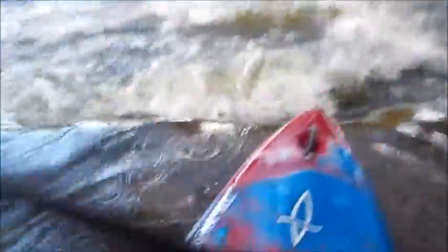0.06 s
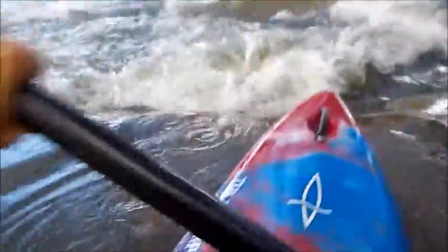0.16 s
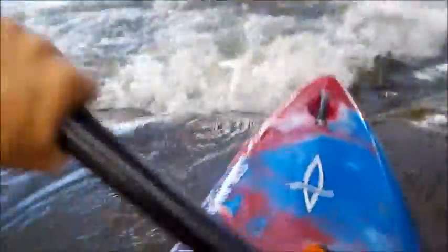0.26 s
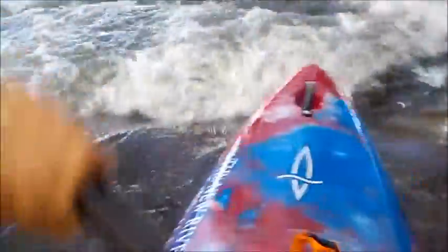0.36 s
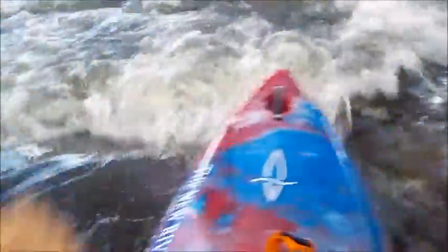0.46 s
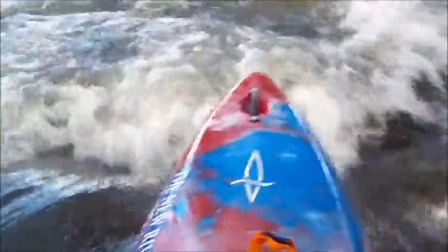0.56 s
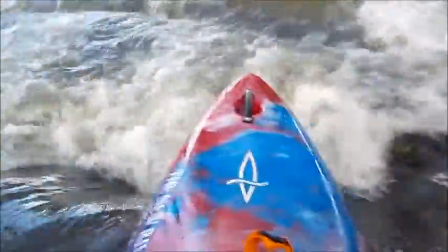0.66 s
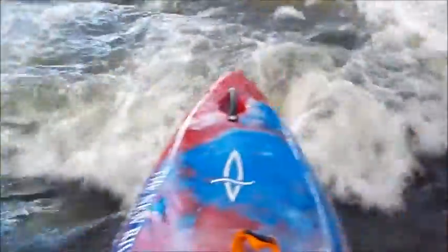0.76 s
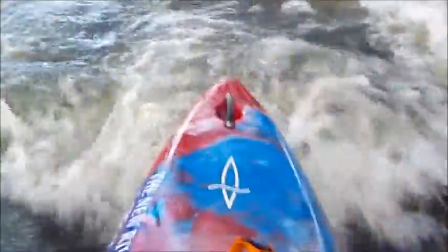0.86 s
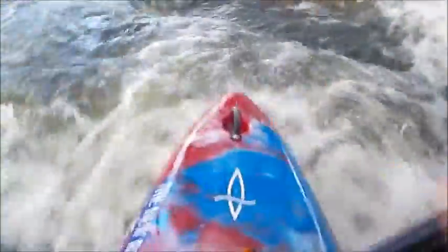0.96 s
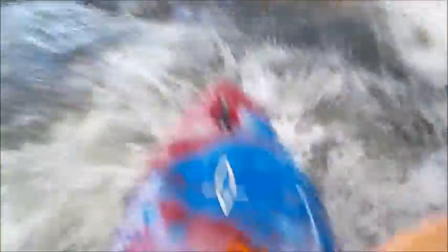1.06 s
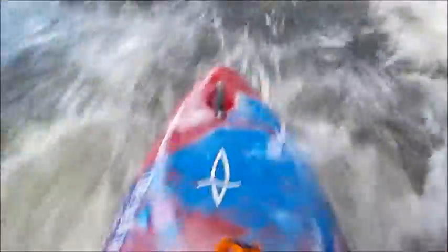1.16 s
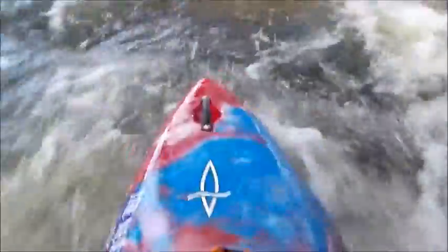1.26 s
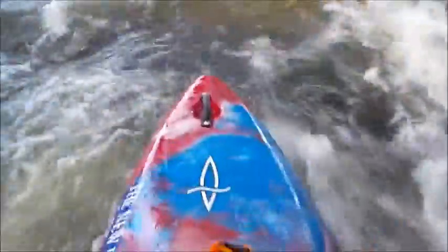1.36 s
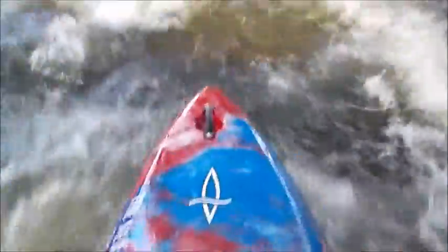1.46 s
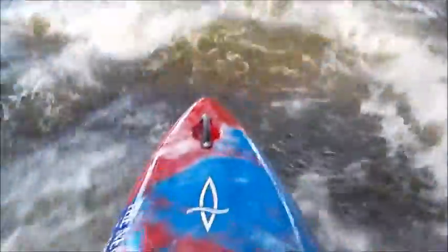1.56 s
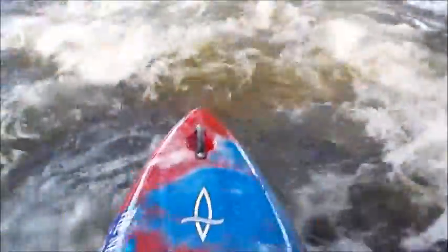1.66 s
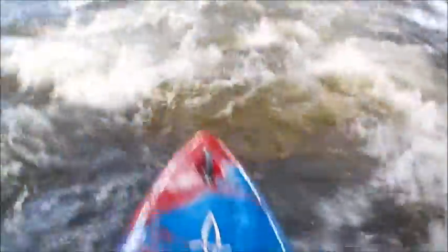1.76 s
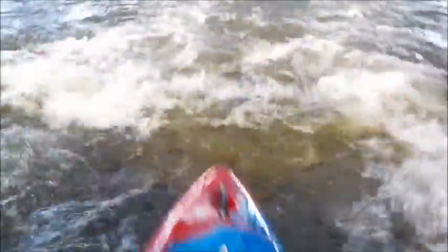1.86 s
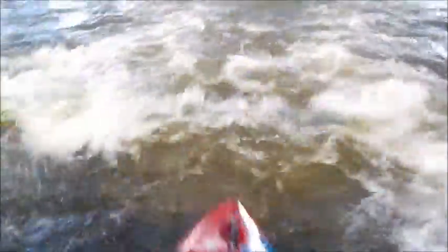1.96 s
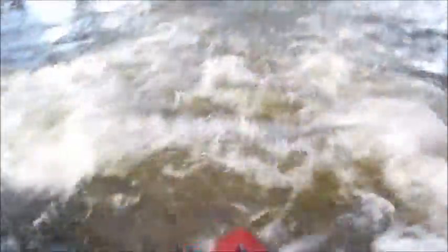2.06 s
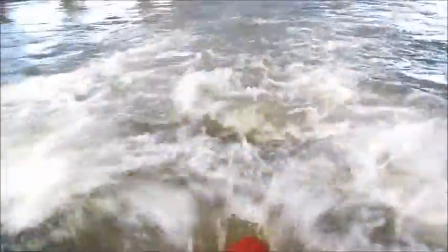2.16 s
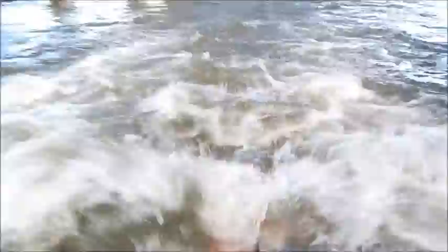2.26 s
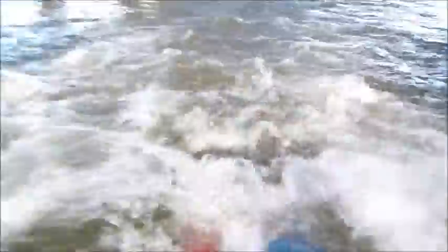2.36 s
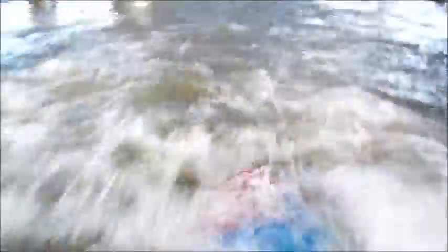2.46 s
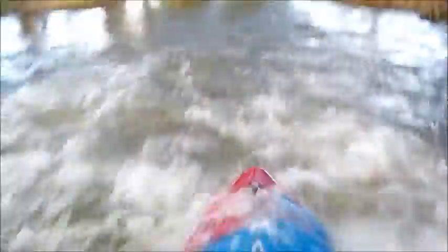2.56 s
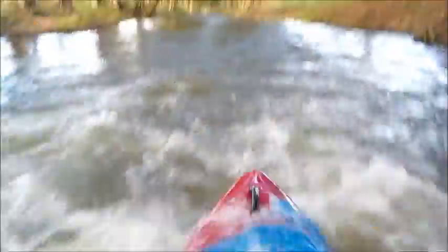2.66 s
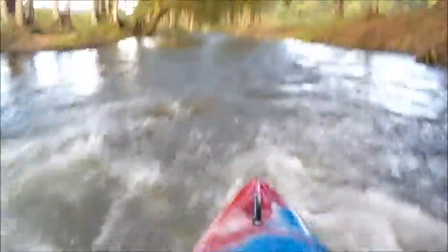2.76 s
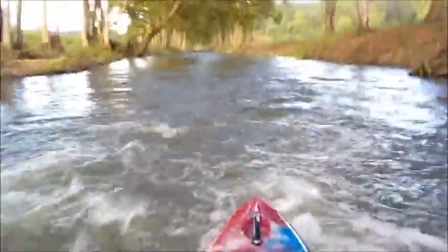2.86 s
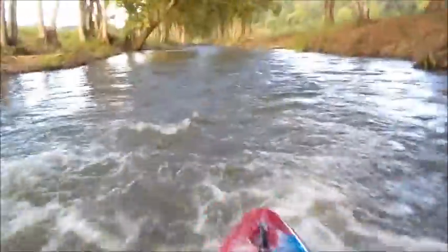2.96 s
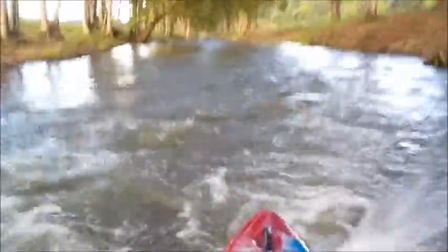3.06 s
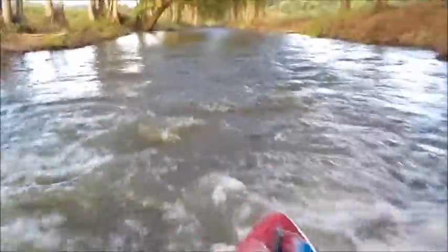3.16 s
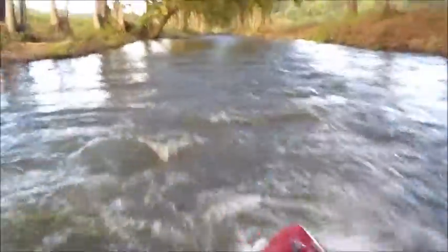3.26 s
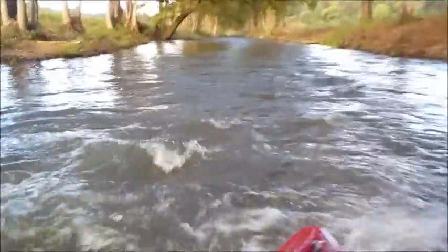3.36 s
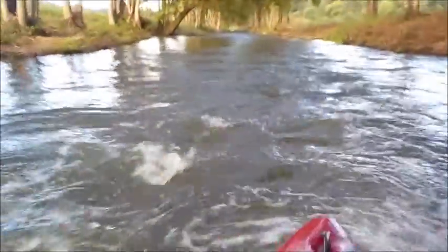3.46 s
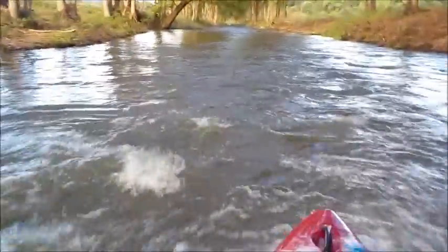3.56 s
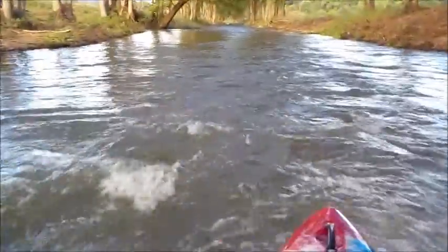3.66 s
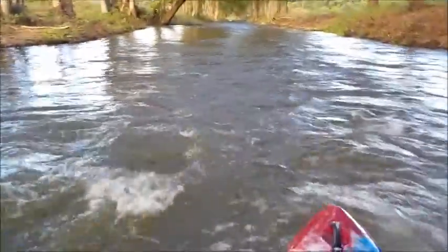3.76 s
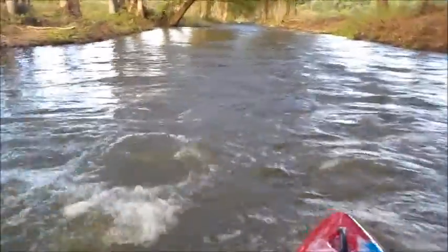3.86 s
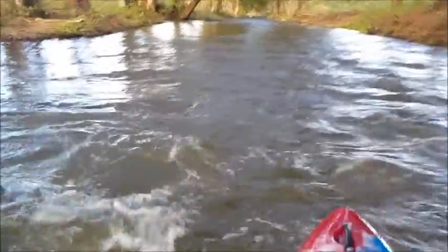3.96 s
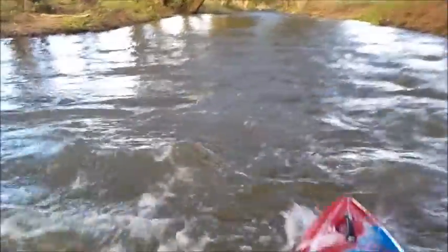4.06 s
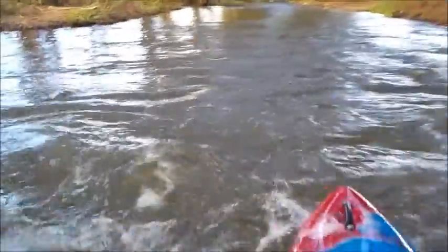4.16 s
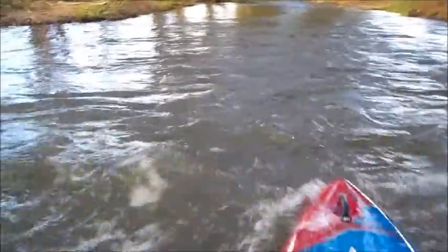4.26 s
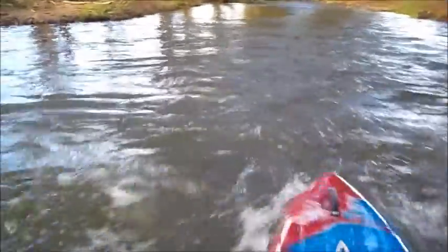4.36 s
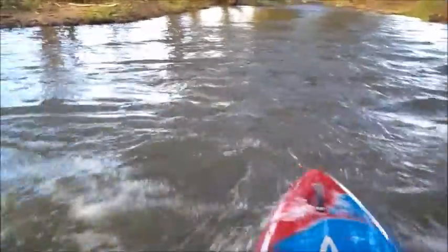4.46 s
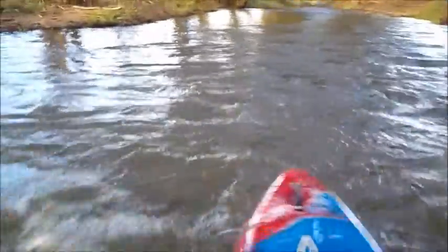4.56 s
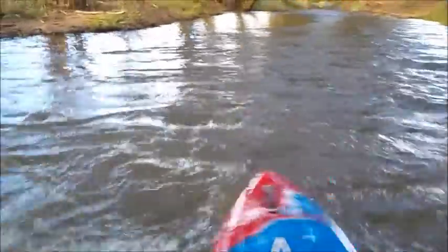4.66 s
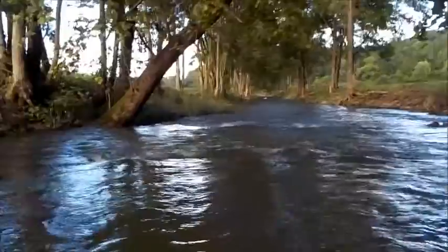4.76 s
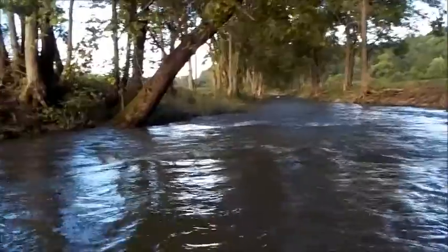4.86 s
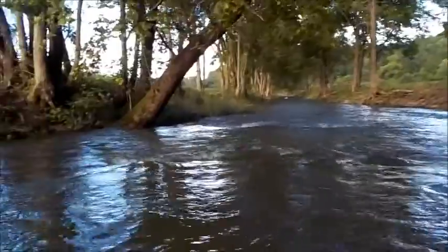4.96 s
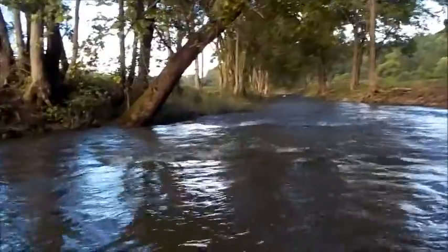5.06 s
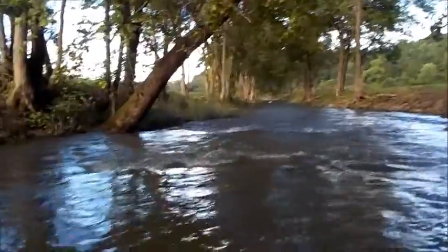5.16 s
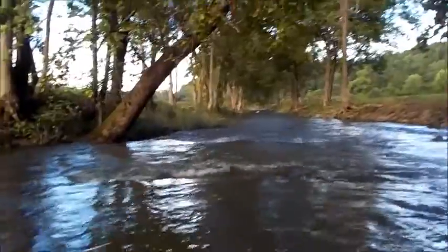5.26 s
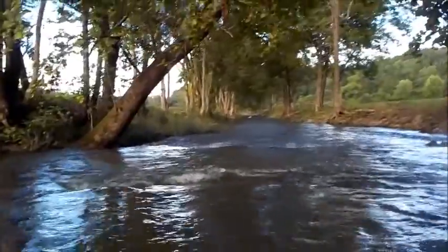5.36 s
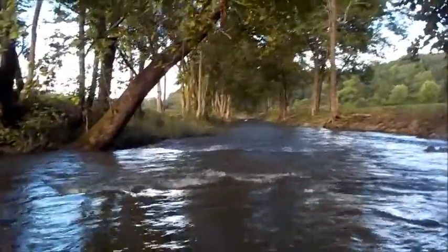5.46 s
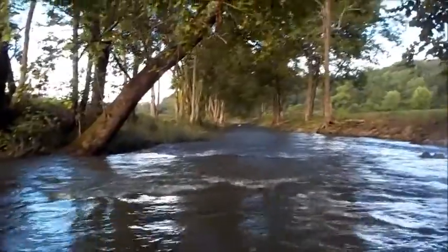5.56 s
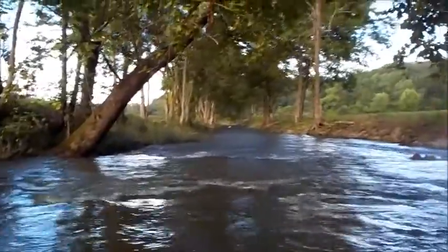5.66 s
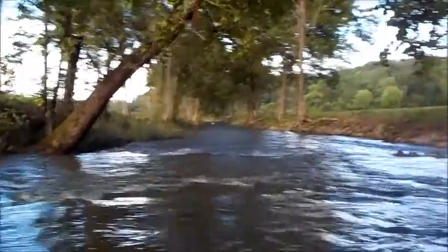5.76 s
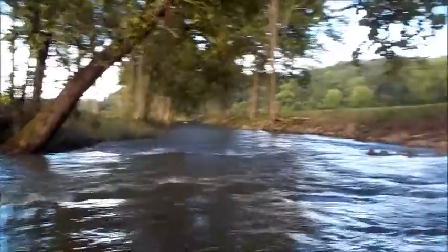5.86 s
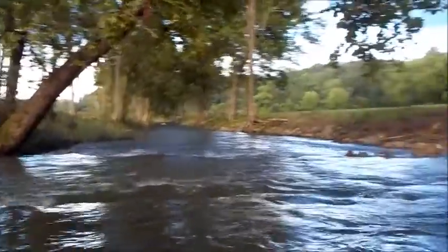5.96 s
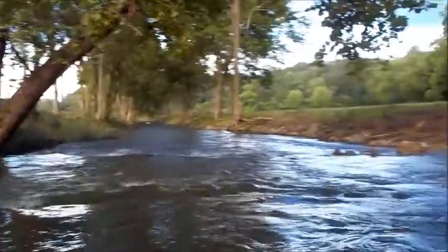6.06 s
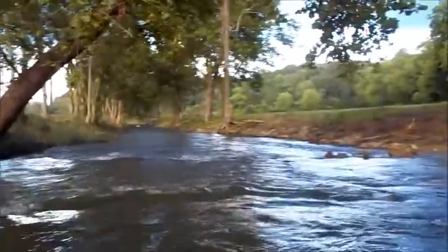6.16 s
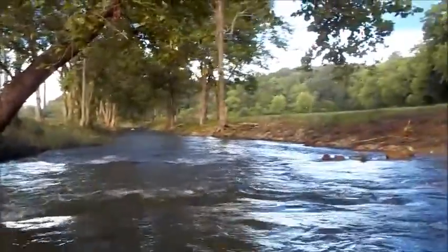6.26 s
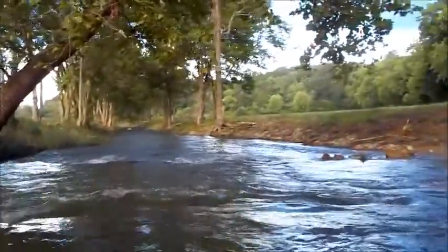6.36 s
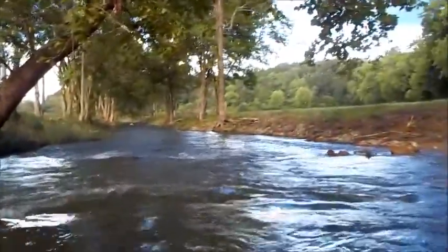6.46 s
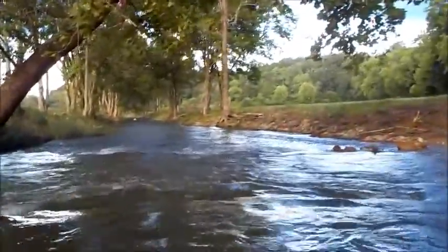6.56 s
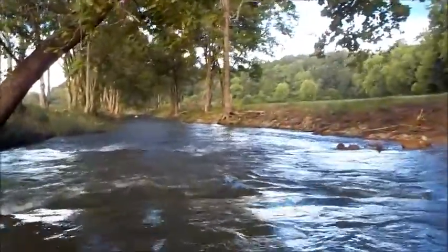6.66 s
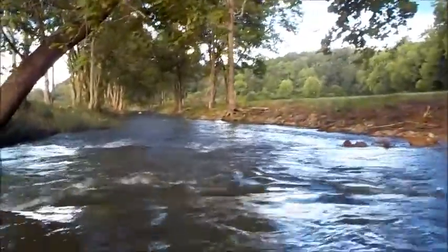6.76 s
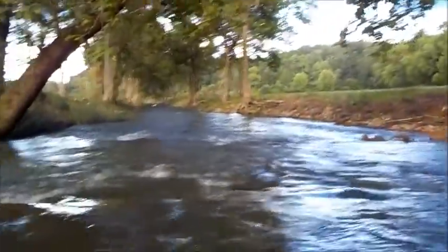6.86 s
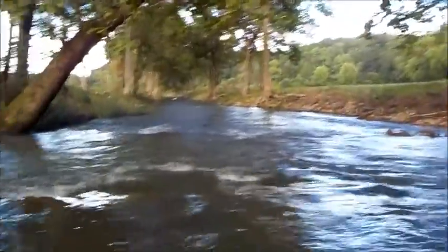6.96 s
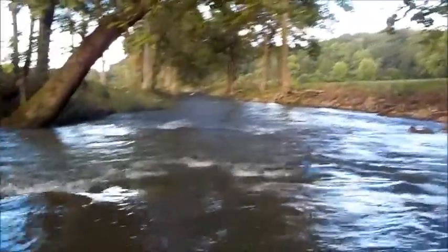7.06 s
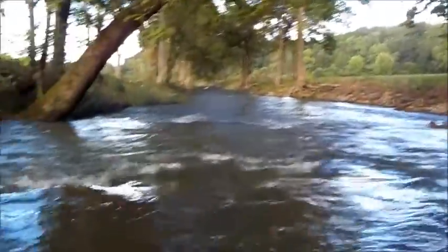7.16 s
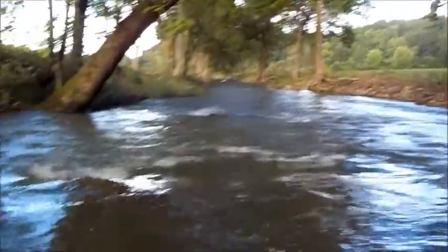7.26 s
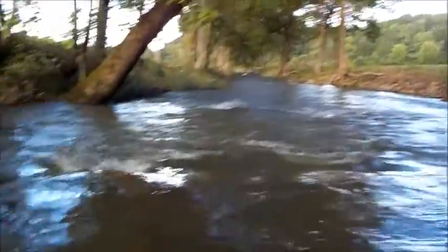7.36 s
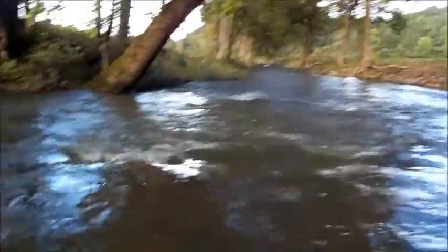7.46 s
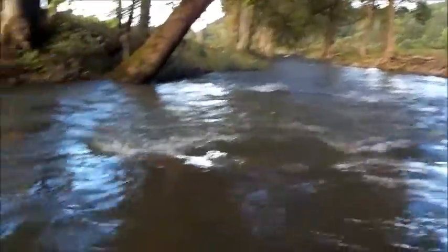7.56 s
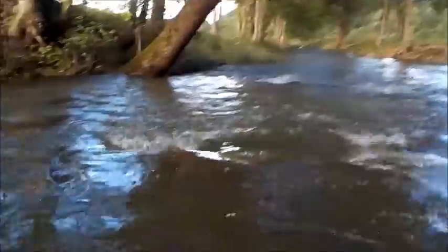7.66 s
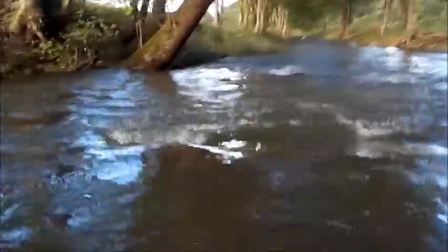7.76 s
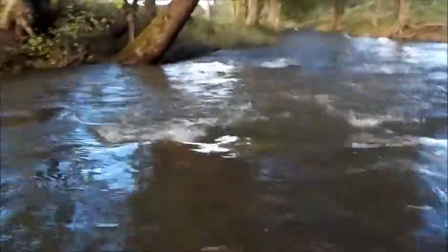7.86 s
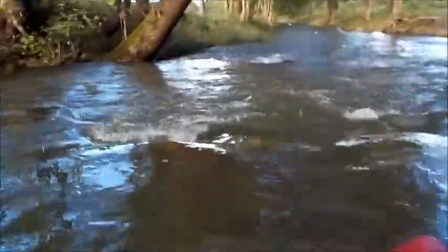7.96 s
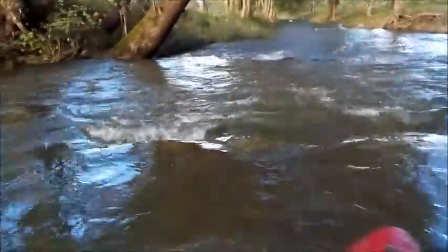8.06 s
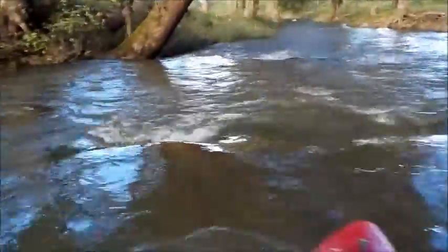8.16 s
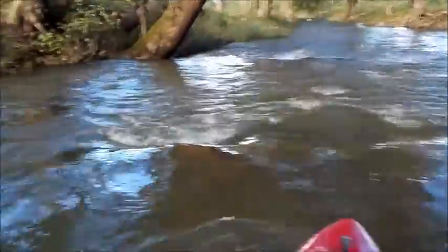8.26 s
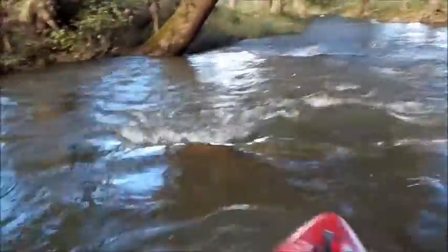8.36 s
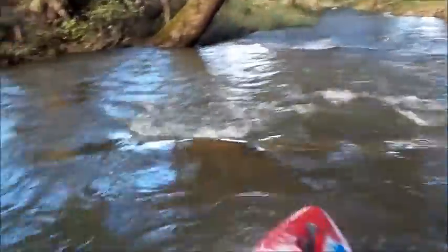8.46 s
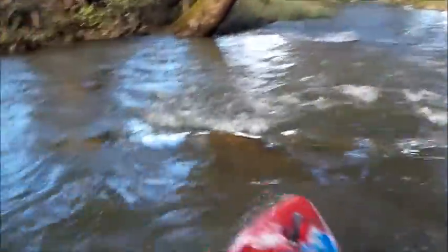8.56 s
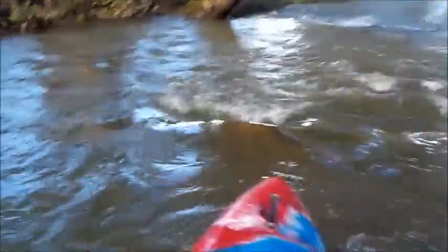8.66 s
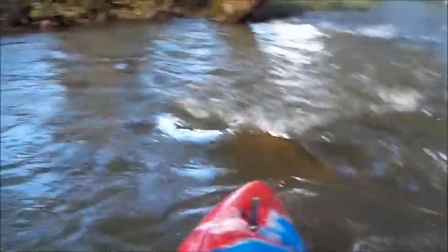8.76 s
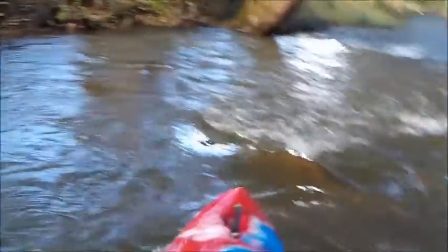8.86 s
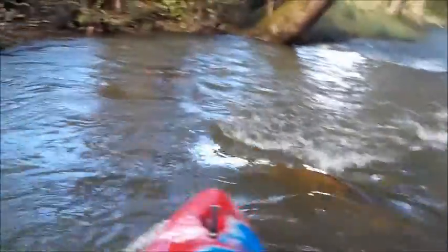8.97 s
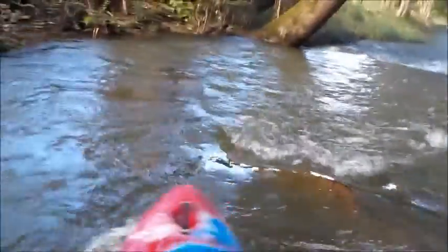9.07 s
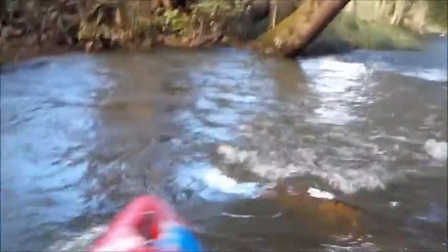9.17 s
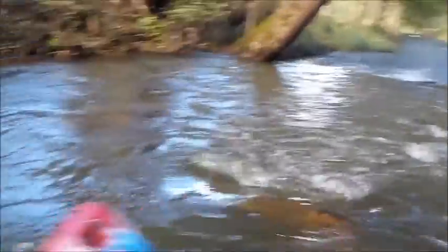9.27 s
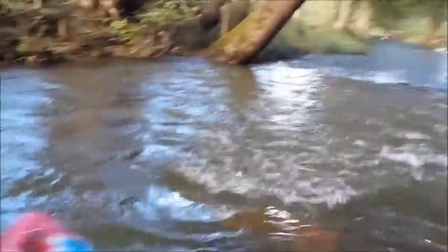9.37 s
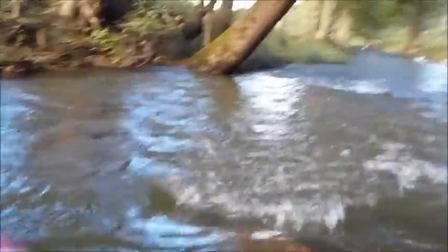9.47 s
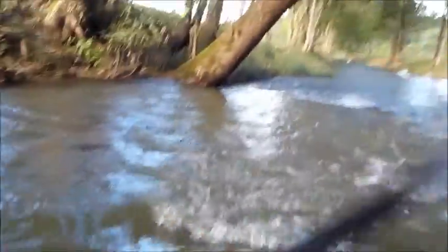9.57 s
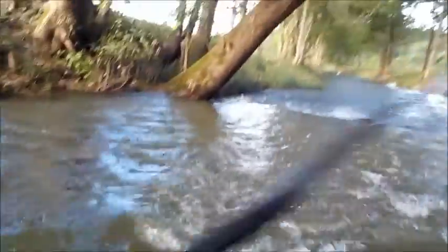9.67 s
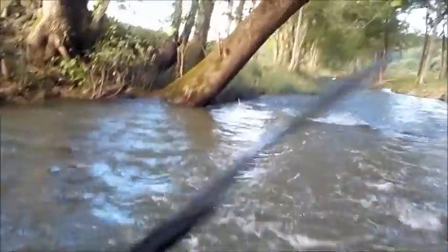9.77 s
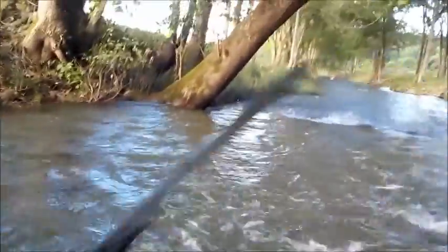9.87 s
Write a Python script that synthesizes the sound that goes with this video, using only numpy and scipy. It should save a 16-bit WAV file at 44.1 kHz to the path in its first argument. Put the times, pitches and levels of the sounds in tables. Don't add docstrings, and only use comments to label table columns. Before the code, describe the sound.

Outdoors on a river, a close microphone in a waterproof housing catches a thick, mid-heavy rush with little bass and a hissy upper edge. It surges through a breaking wave with hollow bubble plops and crisp spray, then recedes. After a sudden change of scene the water is much softer, gently gurgling and gradually nearing, with a few hull knocks and brief bright drops.

```python
import sys
import numpy as np
from scipy import signal
from scipy.fft import rfft, irfft, next_fast_len
from scipy.io import wavfile
from scipy.ndimage import uniform_filter1d

SR = 44100
rng = np.random.default_rng(int(sys.argv[2]) if len(sys.argv) > 2 else 0)


def voltage_ratio(decibels):
    exponent = np.asarray(decibels, float) / 20
    return 10 ** exponent


def store_pcm(level_fs):
    pcm = np.round(np.clip(level_fs, -1, 1) * 32767).astype(np.int16)
    wavfile.write(sys.argv[1], SR, np.atleast_2d(pcm).T)


N = 437913
SCENE_CHANGE_S = 4.753
SIDES = np.array([[.5], [-.5]])


def evened(x):
    return x / np.sqrt(np.mean(x ** 2) + 1e-20)


def read(points, hz):
    f, value = np.transpose(points)
    return np.interp(np.log(hz + 1), np.log(f + 1), value)


def add(mix, s, sound):
    part = mix[:, round(s * SR):][:, :sound.shape[1]]
    part += sound[:, :part.shape[1]]


def coloured(x, gain):
    size = next_fast_len(N)
    hz = np.fft.rfftfreq(size, 1 / SR)
    return irfft(rfft(x, size) * gain(hz), size)[..., :N]


# (time [s], level [dB])
NEARNESS = [(0, -26), (.35, -25), (.7, -23.5), (1.1, -21.5), (1.6, -21.5), (2.1, -21.5), (2.55, -22.5),
            (2.95, -22.5), (3.4, -26), (3.9, -28.5), (4.35, -30.5), (4.752, -29.5), (4.754, -36),
            (5.8, -36), (6.9, -35.5), (7.9, -34), (8.9, -33.5), (9.93, -32.5)]


def nearness(t):
    return np.interp(t, *np.transpose(NEARNESS))


# (frequency [Hz], likeness [0 to 1])
LIKENESS = [(60, 0.64), (140, 0.95), (330, 0.99), (1000, 0.99), (2000, 0.97), (3500, 0.83), (5200, 0.54),
            (6500, 0.37), (8000, .1)]
# (frequency [Hz], lead [radians])
LEFT_LEAD = [(0, 0.26), (5000, 0.07), (6900, 0.17), (8000, -.4)]


def foam():
    left, other = rng.standard_normal((2, N))

    def likeness(hz):
        return np.clip(read(LIKENESS, hz), 0, 1)

    shared = coloured(left, lambda hz: likeness(hz) * np.exp(-1j * read(LEFT_LEAD, hz)))
    separate = coloured(other, lambda hz: np.sqrt(1 - likeness(hz) ** 2))
    return np.array([left, shared + separate])


def bubbles(per_s=5000, cycles=5.1, spread_db=2.5, glide=0.27, apart_s=4e-5, count=16):
    out = np.zeros((2, N))
    hit = rng.random(N) < per_s / SR
    kind = rng.integers(0, count, N)
    big = rng.exponential(1, N)
    size = hit * voltage_ratio(spread_db * np.minimum(big, 5))
    for k, hz in enumerate(np.geomspace(180, 8000, count)):
        t = np.arange(20 + round(2 * cycles / hz * SR)) / SR
        delay = apart_s * rng.standard_normal() * SIDES
        run = np.maximum(t - 1e-4 + delay, 0) * hz
        swell = run * np.exp(-4 * run / cycles)
        ring = swell * np.sin(2 * np.pi * run * (1 + glide * run / cycles))
        ring *= np.sqrt(hz) / np.linalg.norm(ring[0])
        out += signal.oaconvolve((size * (kind == k))[None], ring, axes=1)[:, :N]
    return evened(out)


LAYER_HZ = [200, 1000, 3700, 6500]
EXTRA_SWING = [.1, 0.045, 0.093, 0]
WAVE_DB = [1.3, 0, 0.43, 0]
RIFFLE_DB = [-1.5, 0.77, 0.59, 0.28]
LURCH_DB = [2.7, 0.98, 0.44, 0.21]


def churn(x, patchy_db=0.51, lurch_s=.12):
    hz, t, z = signal.stft(x, SR, nperseg=512, noverlap=384)
    wander = rng.standard_normal((len(t), 4))
    lurch = evened(uniform_filter1d(wander, round(lurch_s / t[1]), 0))
    near = nearness(t)
    layers = np.outer(near - near.mean(), EXTRA_SWING) + lurch * LURCH_DB
    layers = layers + np.where(t[:, None] < SCENE_CHANGE_S, WAVE_DB, RIFFLE_DB)
    place = np.interp(np.log(hz + 1), np.log(LAYER_HZ), np.arange(4))
    share = np.maximum(1 - abs(place[:, None] - np.arange(4)), 0)
    chance = rng.standard_normal((len(t), len(hz)))
    patches = evened(uniform_filter1d(uniform_filter1d(chance, 16, 0), 8, 1)).T
    z = z * voltage_ratio(share @ layers.T + patchy_db * patches)
    return signal.istft(z, SR, nperseg=512, noverlap=384)[1][:, :N]


# (frequency [Hz], level per Hz [dB])
CAVITY = [(25, -53), (70, -53), (120, -41.5), (270, -19), (390, -9.5), (740, -1), (1060, -1), (1700, -3.5),
          (1900, -6.5), (2100, -12), (2300, -24), (2420, -43), (2550, -70)]
# (frequency [Hz], level per Hz [dB])
PORTS = [(2300, -40), (2420, -19.5), (2720, -3), (3020, -13.5), (3260, -5), (3600, -1.5), (5140, -8),
         (5740, 1.5), (6170, 3), (7100, -1), (7430, -13), (8100, -34), (8800, -25), (11500, -42.5)]
# (frequency [Hz], left minus right [dB])
LEAN = [(60, 3), (200, -3), (2000, -3), (3500, -2.5), (5500, -1), (6600, -1.5), (7400, -4.5), (8100, -3.5)]


def case(hz):
    port_db = -13
    ports = read(PORTS, hz) + port_db - 60 * (hz < PORTS[0][0])
    db = np.maximum(read(CAVITY, hz), ports)
    return voltage_ratio(db + SIDES * read(LEAN, hz))


# (time [s], change [dB], length [s])
GUSHES = [(0.223, -2.5, 0.028), (0.402, 2.5, 0.046), (0.629, 1, 0.044), (1.034, -1, 0.042),
          (1.05, 3, 0.014), (1.4, 0.5, 0.047), (1.924, 1.5, 0.017), (2.106, 0, 0.041), (2.155, 2.5, 0.046),
          (2.303, 3, 0.1), (2.361, -4.5, 0.034), (2.587, -2, 0.013), (2.673, -1.5, 0.034),
          (2.695, 2.5, 0.024), (4.394, 2, 0.011), (4.694, -0.5, 0.017), (4.856, -1, 0.016),
          (5.69, -0.5, 0.037), (6.367, 1.5, 0.023), (7.242, 2, .05), (7.657, -1, 0.029), (7.74, 2, 0.07),
          (8.013, -3.5, 0.021), (8.252, -2.5, 0.025), (8.377, 1.5, 0.033), (8.82, 2, 0.04),
          (9.27, -1.5, 0.014), (9.36, -2.5, 0.047), (9.62, 0, 0.021), (9.836, 2.5, 0.036)]


def rush():
    t = np.arange(N) / SR
    surge_db = np.zeros((1, N))
    for s, db, length in GUSHES:
        bump = np.hanning(round(2 * length * SR))
        add(surge_db, s - length, db * bump[None])
    water = churn(foam() + voltage_ratio(-8) * bubbles()) * voltage_ratio(surge_db)
    water = coloured(water, case)
    return voltage_ratio(nearness(t) + 0.57) * water / np.std(water.mean(0))


def rings(events, rise_s, lean_db):
    out = np.zeros((2, N))
    for s, db, hz, t60 in events:
        t = np.arange(round(t60 * SR)) / SR
        db = min(db, -7.5)
        fade = (1 - np.exp(-t / rise_s)) * voltage_ratio(db - 60 * t / t60)
        add(out, s, fade * np.sin(2 * np.pi * hz * t) * voltage_ratio(lean_db * SIDES))
    return out


def through_wall(x):
    return coloured(x, lambda hz: hz ** 3 / (hz ** 3 + 350 ** 3))


# (time [s], peak [dB], pitch [Hz], t60 [s])
PLOPS = [(0.384, -13, 1310, 0.018), (0.622, -8, 920, 0.018), (1.051, -2, 1036, 0.033),
         (1.114, -8.5, 608, 0.025), (1.317, -13, 1540, 0.02), (1.397, -10, 920, 0.028),
         (1.552, -9, 1070, 0.026), (2.245, -16, 1370, 0.016), (2.692, -6, 936, 0.03),
         (2.707, -9, 1330, 0.016), (4.386, -10, 850, 0.017), (2.05, -8, 810, 0.027),
         (4.72, -17, 700, 0.024), (7.735, -21, 900, 0.017), (5.834, -23, 850, 0.021),
         (6.359, -21, 990, 0.042), (6.671, -21, 820, 0.018), (6.936, -20, 870, 0.018),
         (7.163, -28, 870, 0.018), (7.282, -19, 1010, 0.029), (7.709, -15, 860, 0.01),
         (7.727, -20, 1320, 0.018), (7.764, -23, 1700, 0.024), (9.011, -18, 1020, 0.016),
         (9.702, -18, 1510, 0.018), (9.765, -12, 1470, 0.018), (9.807, -19, 1420, 0.021),
         (9.844, -20, 1650, 0.018)]


def plops():
    return through_wall(rings(PLOPS, rise_s=.0009, lean_db=-2.8))


# (time [s], peak [dB], left minus right [dB])
TICKS = [(1.2366, -38, -4.0), (1.2889, -37, -9), (1.3817, -38, -3.5), (1.3972, -35, -4.5),
         (1.5414, -41, -2.0), (1.6566, -47, 0.0), (1.6736, -33, -7.0), (1.8187, -39, -9),
         (1.8397, -31, -5.5), (1.8726, -37, -8), (1.923, -38, -4.5), (2.0387, -37, -4.5),
         (2.1405, -37, -1.5), (2.1794, -33, -7), (2.2453, -34, -8), (2.2682, -30, -6.0), (2.354, -34, -17),
         (2.4039, -38, -7.5), (2.4648, -38, -4.0), (2.5002, -37, -2.5), (2.5556, -31, -14),
         (2.5985, -36, -10), (2.6489, -37, -19), (2.6928, -39, -4.5), (2.7491, -36, -4.5),
         (2.8524, -41, -5.0), (3.0085, -33, -10), (4.7515, -45, 0), (9.543, -46, 3), (3.481, -40, -3)]


def fine_ticks(puff_db=-17, puff_s=0.009):
    out = np.zeros((2, N))
    t = (np.arange(1600) - 400) / SR
    tick = np.exp(-(t / 0.00024) ** 2)
    puff = np.exp(-abs(t) / np.where(t < 0, .006, puff_s))
    shape = tick + voltage_ratio(puff_db) * puff
    slot_s = .004
    slots = np.arange(.02, N / SR - .05, slot_s)
    luck, size, side = rng.random((len(slots), 3)).T
    hit = luck < slot_s * 28 * (nearness(slots) + 23.5)
    stray = np.transpose([slots, -50 + 6 * size ** 2, 12 * side - 11])[hit]
    all_ticks = TICKS + stray.tolist()
    for s, db, pan_db in all_ticks:
        noise = rng.standard_normal((3, 1600))
        noise = noise / np.linalg.norm(noise * shape ** 2, axis=1, keepdims=True)
        noise = noise * np.linalg.norm(shape ** 2)
        burst = (0.1 * noise[0] + 0.85 * noise[1:]) * shape
        add(out, s + .001 + t[0], voltage_ratio(db + 3.5 + pan_db * SIDES) * burst)
    return coloured(out, lambda hz: np.clip((hz - 8100) / 2500, 0, 1))


# (time [s], peak [dB], pitch [Hz], t60
# [s])
THUMPS = [(.946, -44, 182, 0.12), (1.0, -53, 70, .07), (1.23, -38.5, 201, 0.11), (1.66, -67, 45, .06),
          (2.3, -64, 50, .07), (3.0, -60, 70, .07), (4.748, -50, 90, 0.033), (6.709, -43, 358, 0.028),
          (6.708, -36, 266, 0.067), (6.71, -46, 171, .08), (6.72, -66, 70, .05), (6.934, -35, 320, .03),
          (8.6, -57, 167, 0.071), (9.0, -54, 190, 0.059), (9.628, -72, 60, .04), (9.922, -44, 90, .03)]


def thumps():
    return rings(THUMPS, rise_s=0.0044, lean_db=-5.0)


# (time [s], peak [dB], pitch [Hz], t60 [s])
DROPS = [
    (2.5777, -20, 4260, .007),
    (2.6894, -19, 3480, .007),
    (3.008, -18, 3900, .008),
    (4.6931, -29, 6060, 0.007),
    (9.3895, -21, 5800, 0.0086),
    (9.6253, -9.5, 6770, 0.0063),
    (3.2579, -21, 4080, 0.011),
    (5.4773, -22, 3880, 0.0065),
    (9.6565, -26, 3550, 0.01),
    (9.9109, -31, 3750, 0.01),
]


def case_drops():
    return through_wall(rings(DROPS, rise_s=0.00055, lean_db=-2.5))


def scene():
    return rush() + plops() + fine_ticks() + thumps() + case_drops()


def low_pass(x):
    return signal.sosfilt(signal.butter(12, 15770, fs=SR, output="sos"), x)


# (frequency [Hz], level per Hz [dB])
HISS = [(4820, -37), (8200, -1), (8610, -9), (10500, -10), (15100, -7), (15600, -8)]


def record(dry):
    shared, left, right = rng.standard_normal((3, N))
    hiss = np.array([0.85 * shared + 0.63 * left, 0.76 * shared + 0.57 * right])
    hiss = coloured(hiss, lambda hz: voltage_ratio(read(HISS, hz)) * (hz > 8000))
    heard = dry + voltage_ratio(-69.5) * hiss / np.std(hiss.mean(0))
    ceiling = .55
    heard = heard / (1 + (heard / ceiling) ** 6) ** (1 / 6)
    notch_hz, notch_width_hz, notch_db = 8120, 170, -14
    heard = coloured(heard, lambda hz: voltage_ratio(notch_db * np.exp(-((hz - notch_hz) / notch_width_hz) ** 2)))
    return low_pass(heard)


dry = scene()
out = record(dry)
store_pcm(out)
```